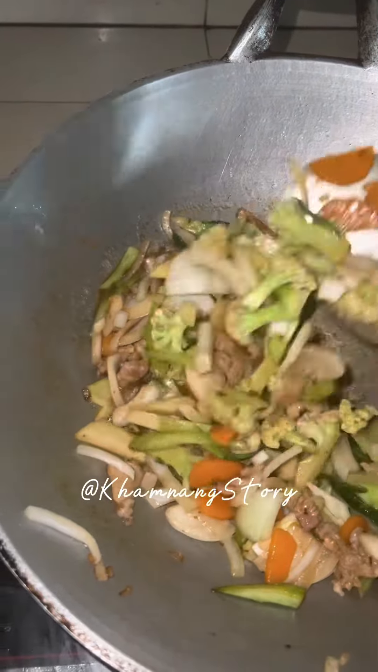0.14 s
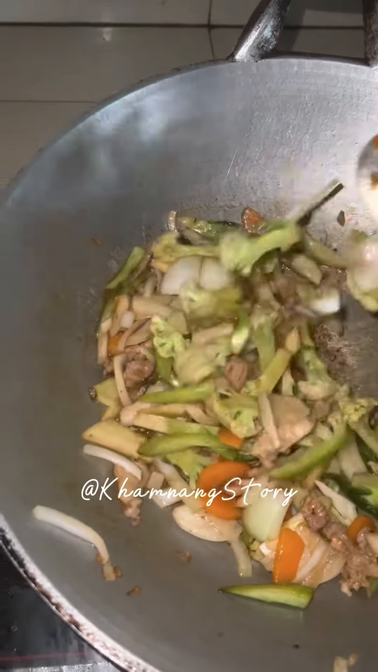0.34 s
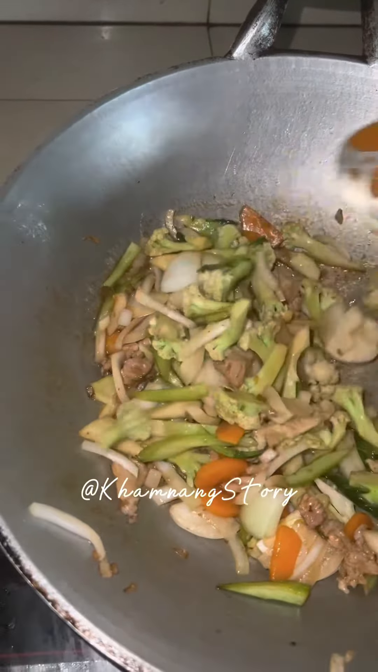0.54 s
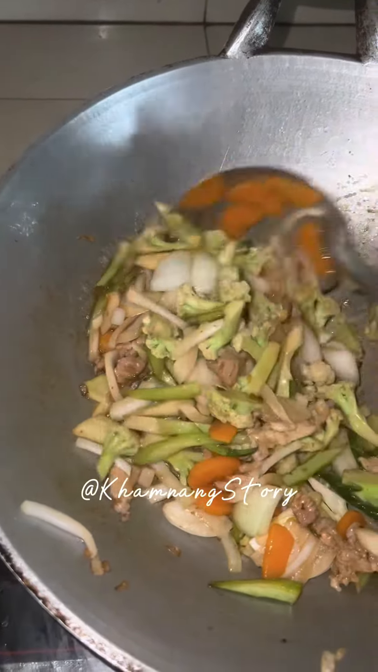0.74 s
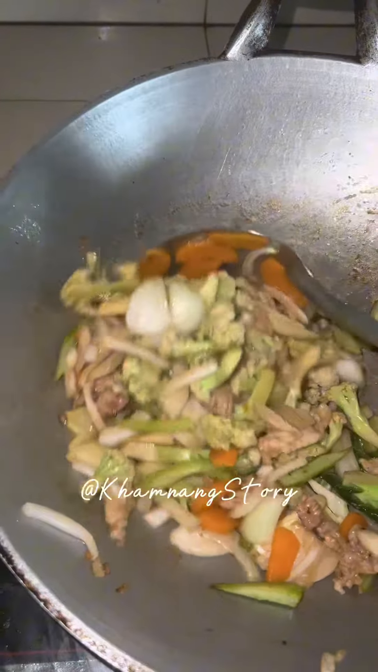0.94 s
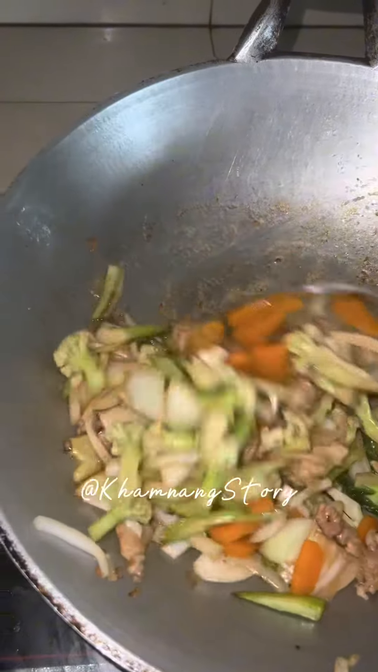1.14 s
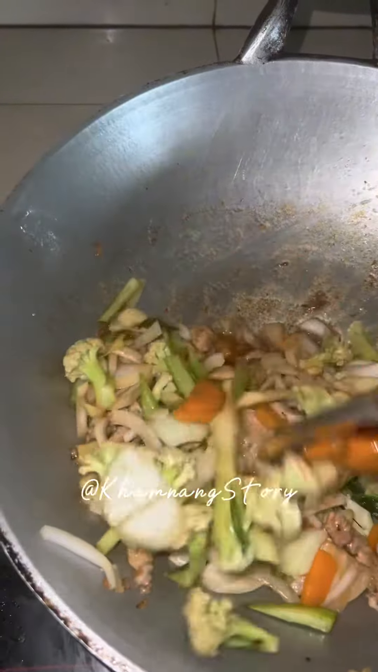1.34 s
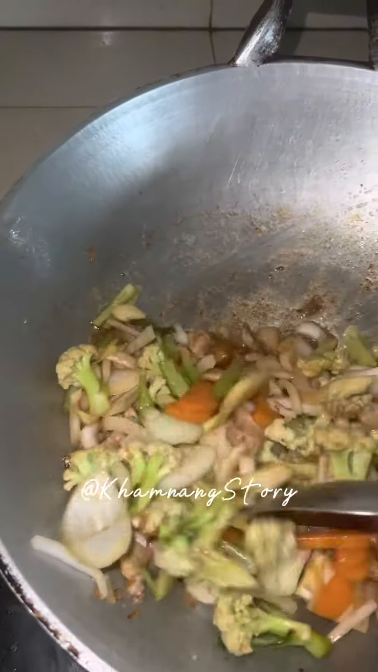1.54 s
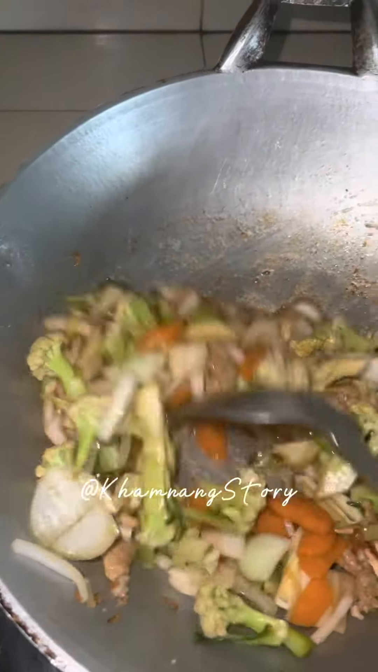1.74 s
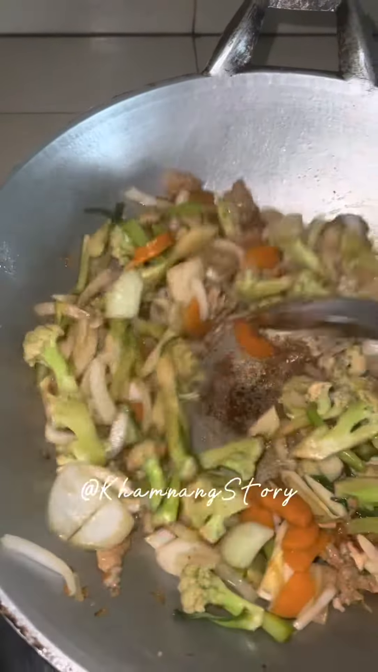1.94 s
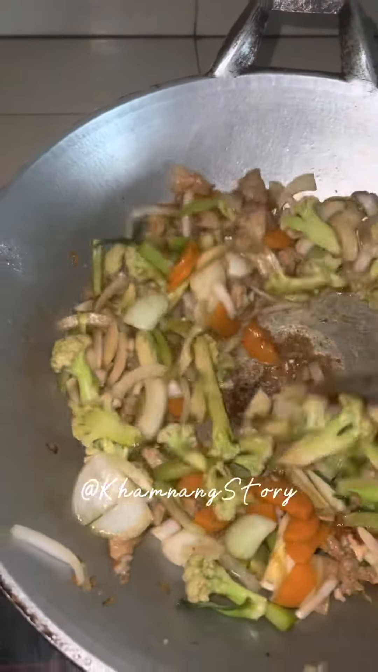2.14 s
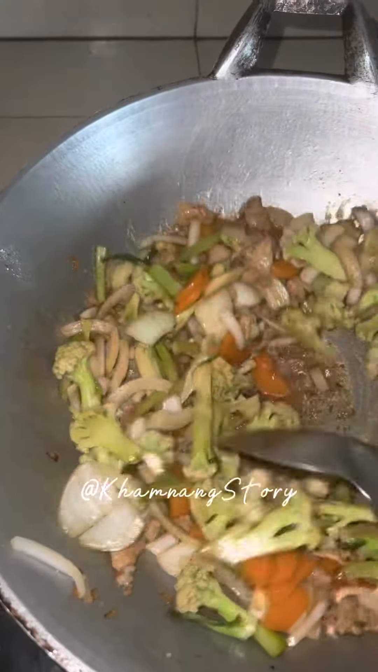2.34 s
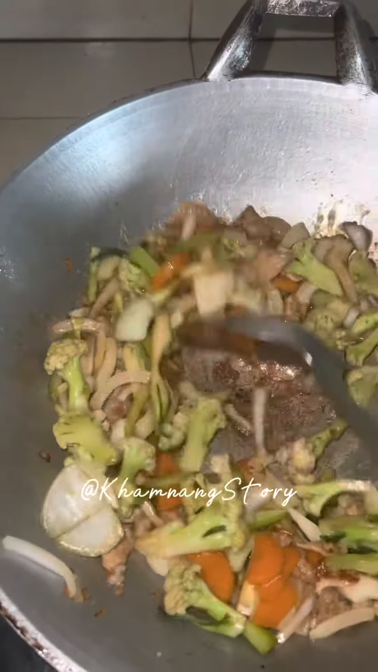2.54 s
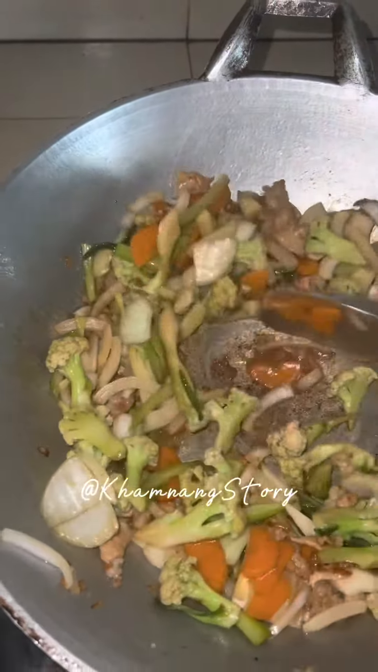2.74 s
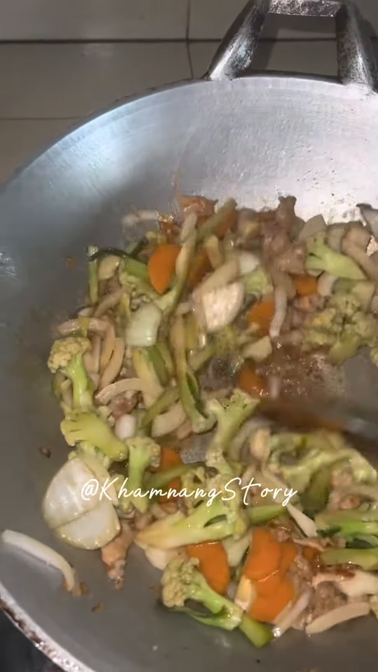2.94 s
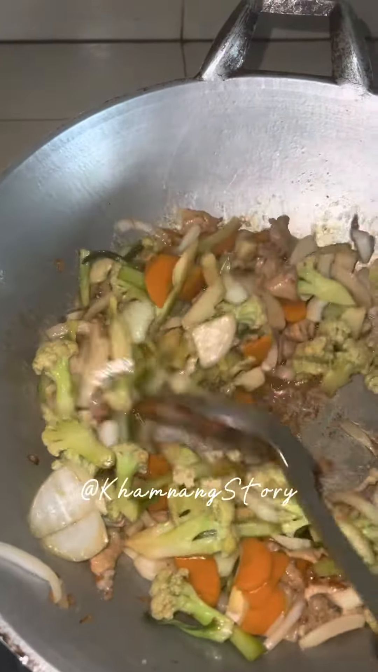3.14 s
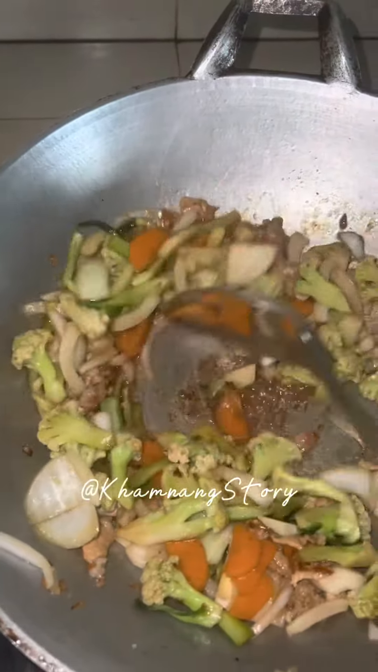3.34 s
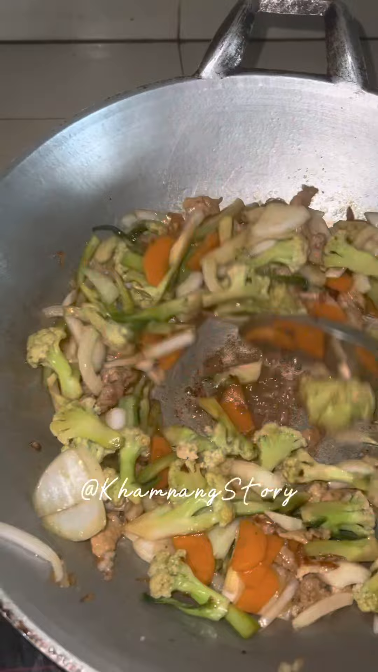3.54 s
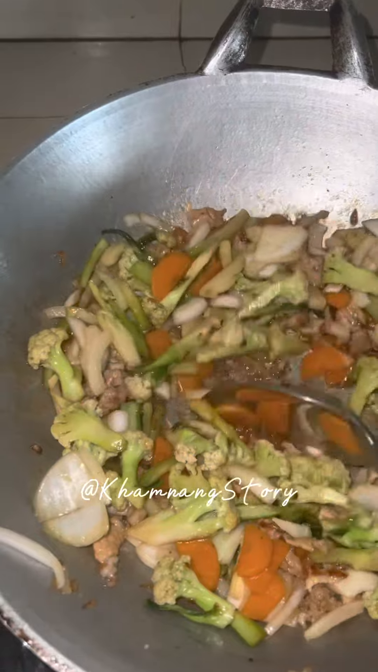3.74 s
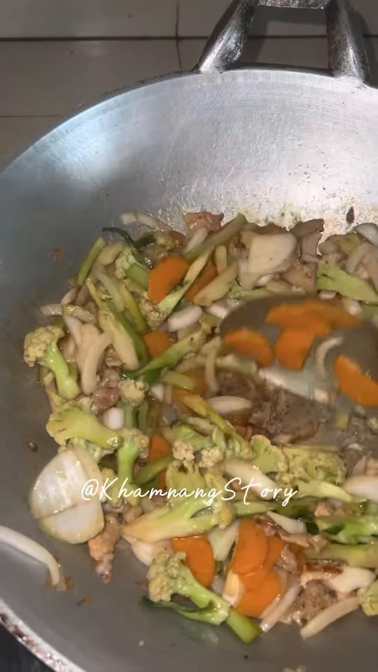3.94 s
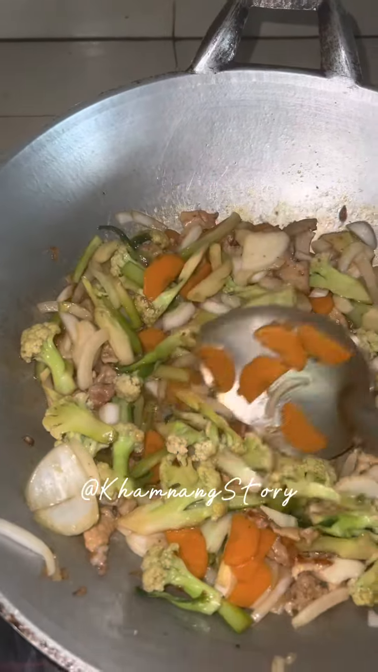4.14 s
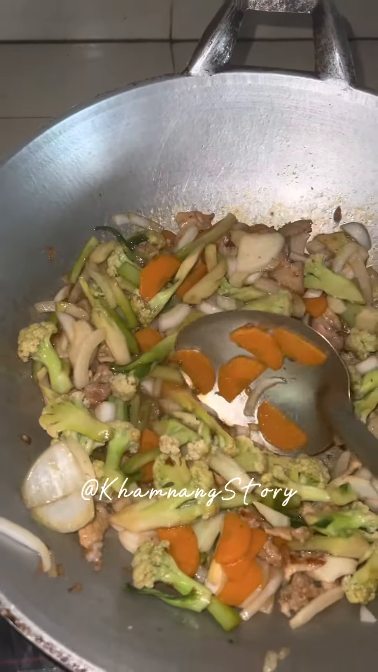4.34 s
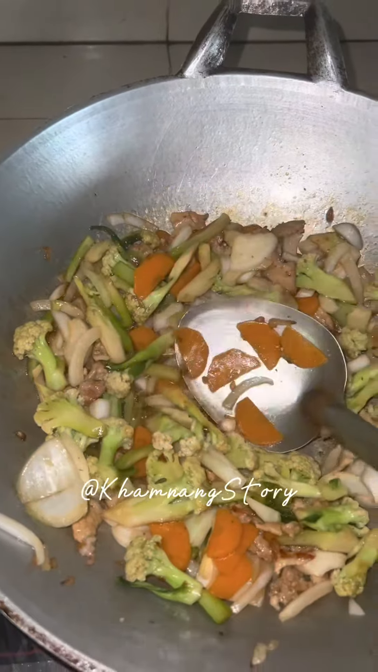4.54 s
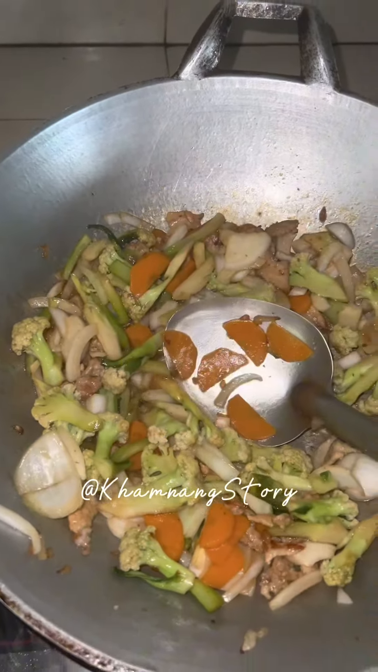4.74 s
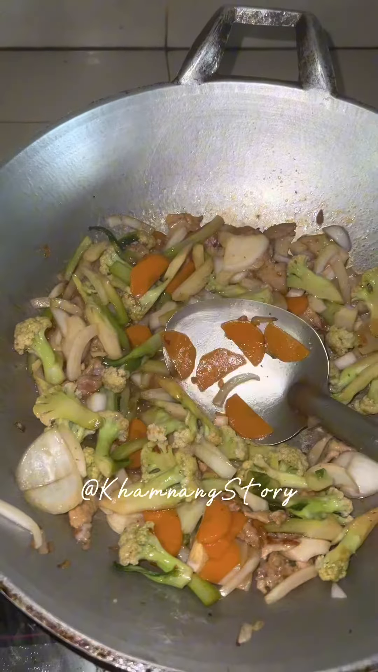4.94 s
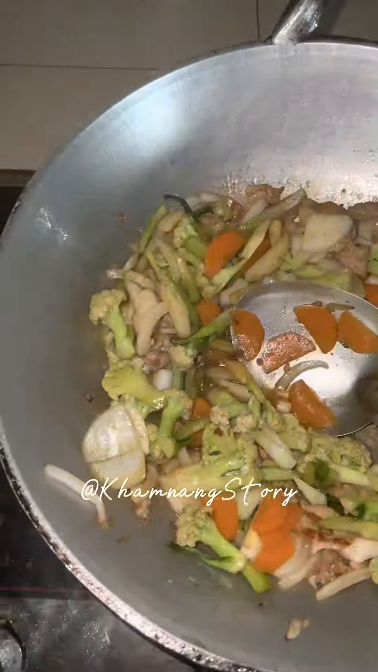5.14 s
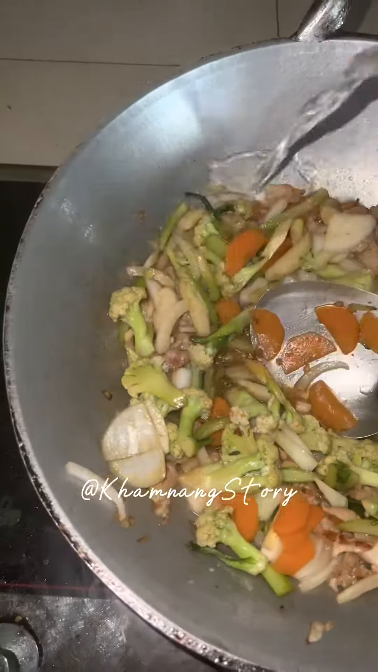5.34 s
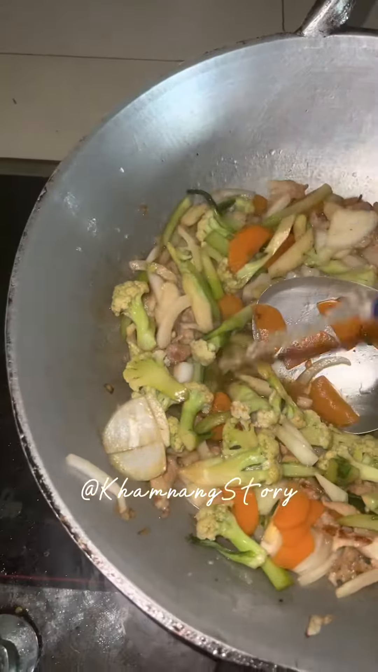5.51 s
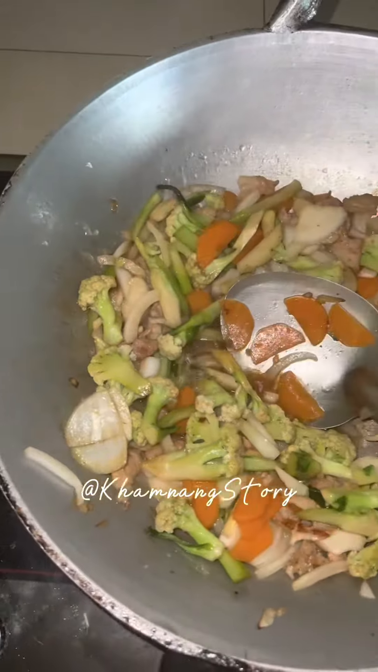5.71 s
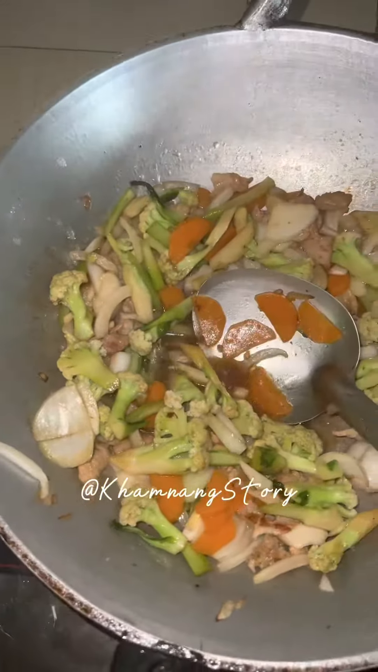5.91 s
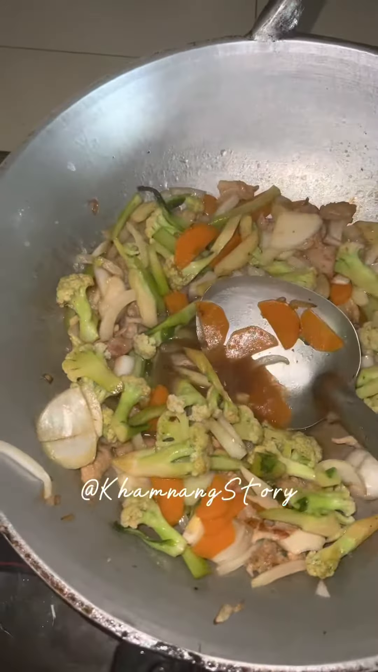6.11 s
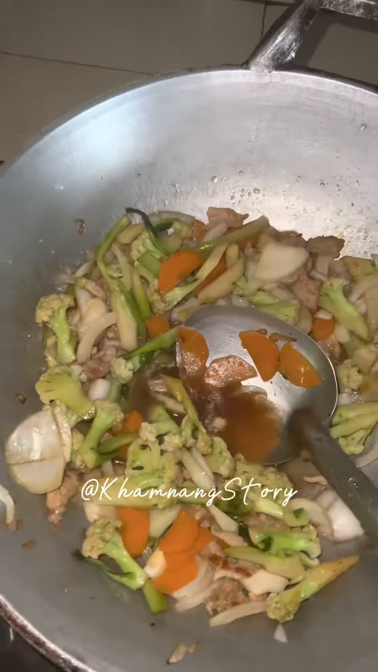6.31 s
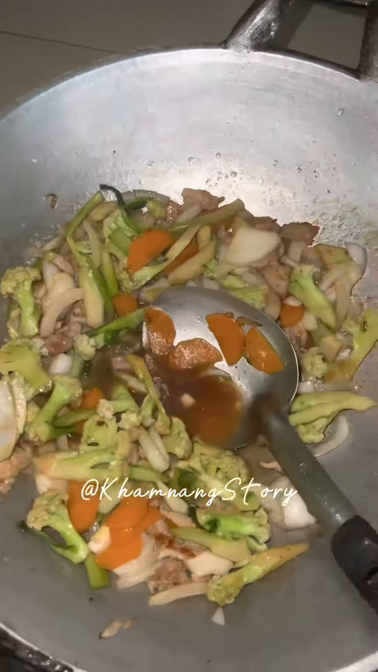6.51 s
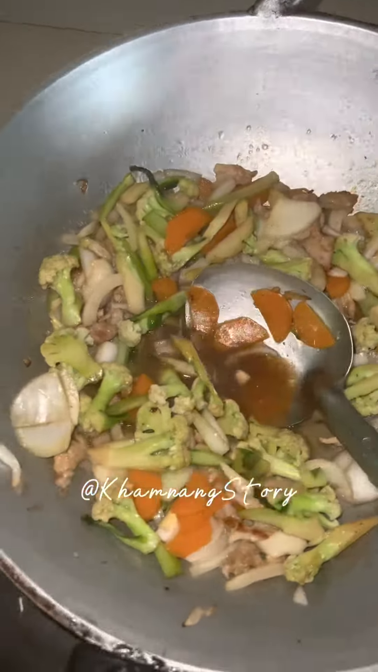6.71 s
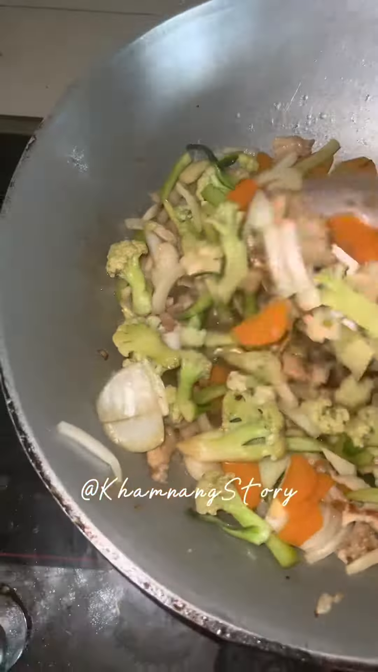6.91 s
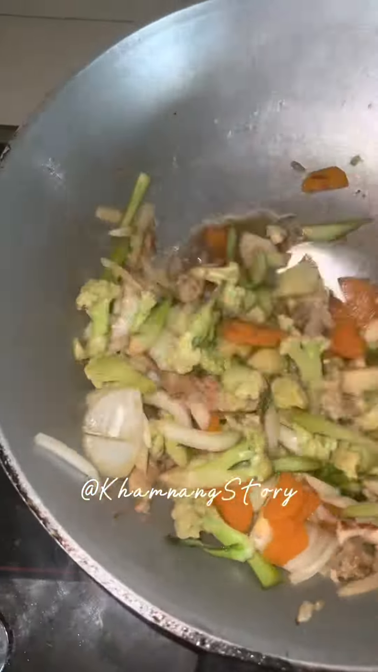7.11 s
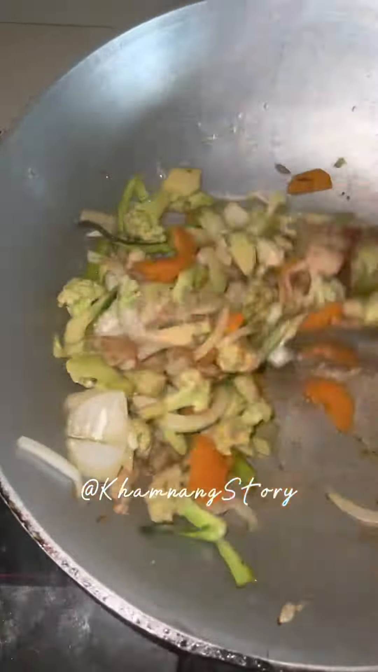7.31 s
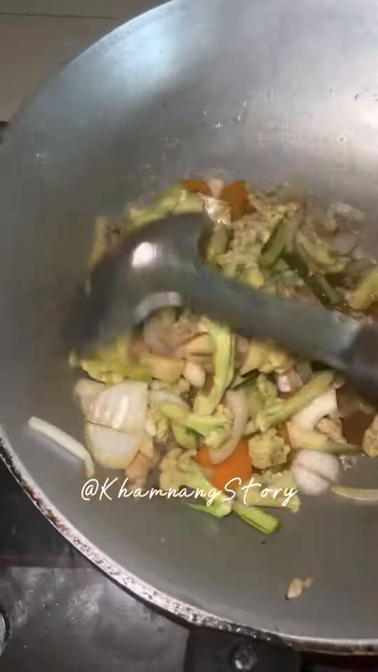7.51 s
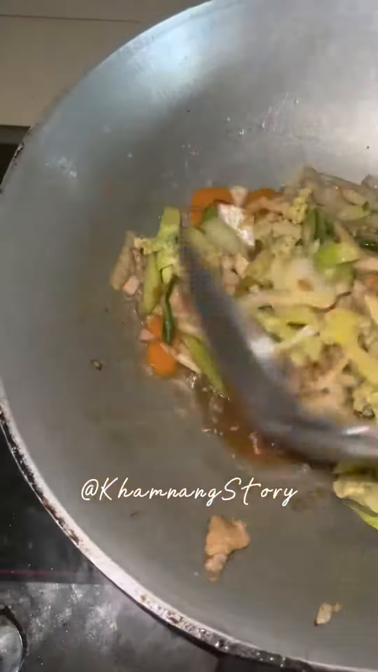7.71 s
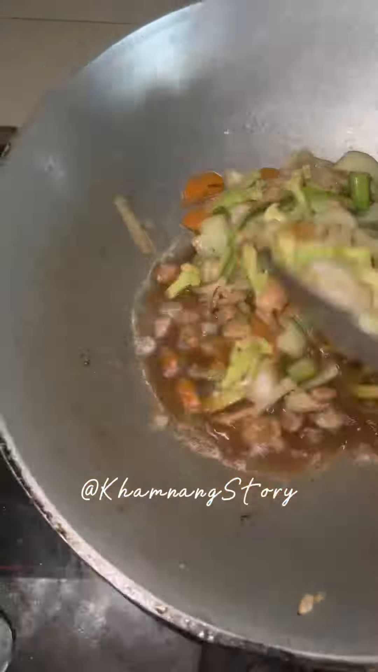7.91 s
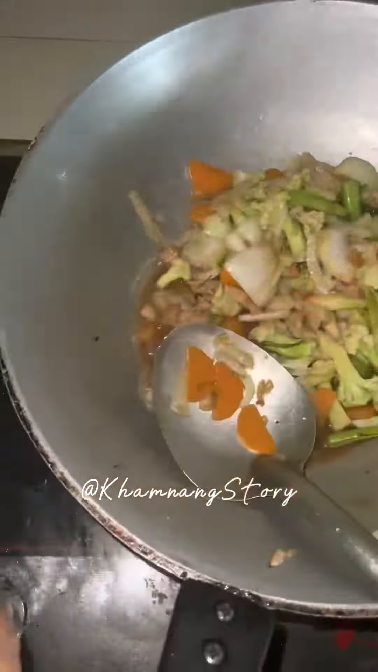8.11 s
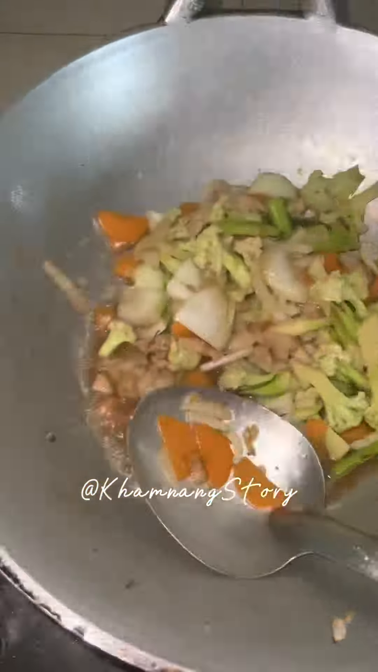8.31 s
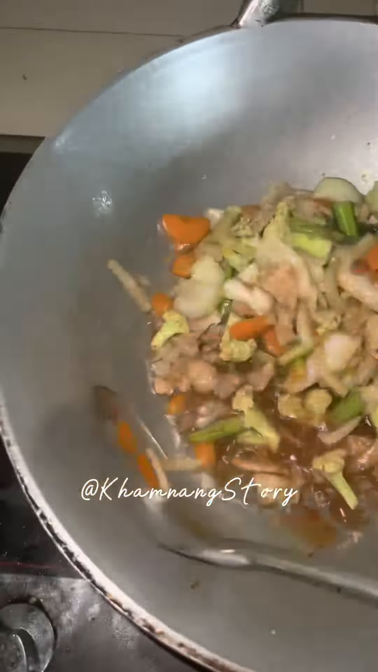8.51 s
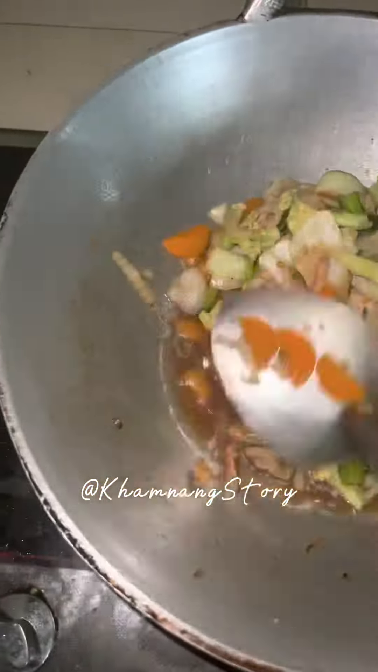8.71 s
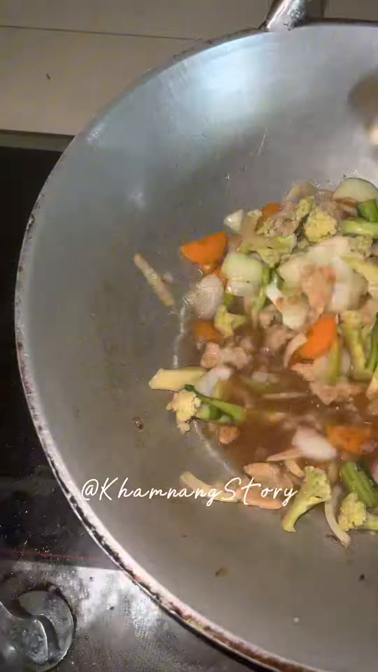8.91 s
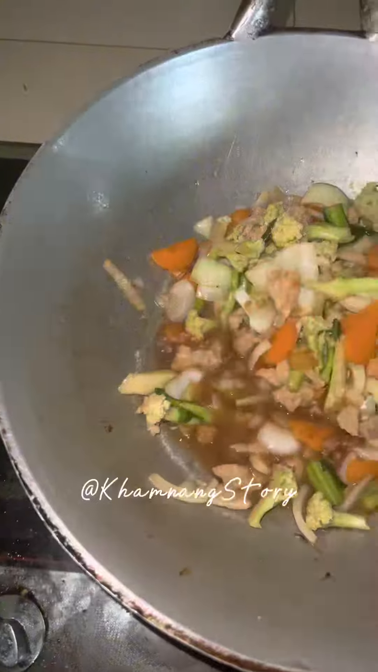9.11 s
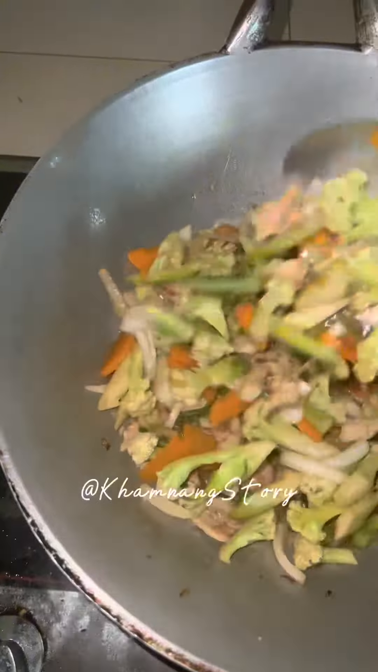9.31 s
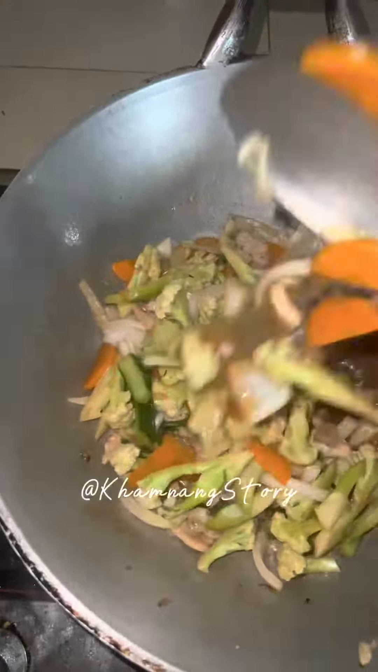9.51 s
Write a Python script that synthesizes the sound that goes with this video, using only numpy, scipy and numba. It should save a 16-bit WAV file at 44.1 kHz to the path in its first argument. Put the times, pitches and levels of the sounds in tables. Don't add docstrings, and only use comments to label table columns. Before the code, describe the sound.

Slow-motion stir-frying with drawn-out metallic knocks and groaning scrapes over low rumble and fizz, then the speed jumps to crisp, sharp ladle clatter.

```python
import sys
import numpy as np
from scipy import signal
from scipy.io import wavfile
from scipy.ndimage import uniform_filter1d
from numba import njit

SR = 44100
rng = np.random.default_rng(int(sys.argv[2]) if len(sys.argv) > 2 else 0)


def log_audio(samples):
    frames = np.atleast_2d(samples).T
    limited = np.clip(frames, -1, 1)
    pcm = np.round(limited * 32767).astype(np.int16)
    wavfile.write(sys.argv[1], SR, pcm)


def field_ratio(decibels):
    return 10 ** (np.asarray(decibels, dtype=float) / 20)


N = 426006

# time in seconds, factor on every pitch (1 = slow motion).
SPEED = [(0, 1), (5.07, 1), (5.09, 2.8), (5.3, 3.2), (5.6, 4.2), (5.9, 6), (6.25, 7.6), (6.55, 8.3),
         (6.79, 8.75), (6.94, 9.37), (7.48, 10.74), (7.7, 10.88), (9.7, 10.88)]
# time in seconds, sizzle level in dB, how open the hot steel lies (about -1 to 1).
FRYING = [(0, -41.5, 0.25), (.62, -38, 0.054), (1.32, -40.5, -0.18), (1.9, -36.5, -0.15), (2.5, -41, 0.23),
          (3.35, -39, 0.13), (3.9, -40, 0.17), (5.05, -40, -0.094), (5.1, -41, 0.27), (5.3, -41, 0.36),
          (5.51, -42, 0.32), (6.5, -47, -0.14), (7.05, -41.5, -0.4), (7.56, -48.5, -0.88), (8.2, -49, -1.5),
          (8.6, -50, -0.61), (9.0, -49.5, -0.29), (9.66, -45.5, -0.48)]


def evened(x):
    return x / np.sqrt(np.mean(x ** 2) + 1e-20)


def read(points, hz):
    f, value = np.transpose(points)
    return np.interp(np.log(hz + 1), np.log(f + 1), value)


def curve(rows, t):
    s, *columns = np.transpose(rows)
    return np.array([np.interp(t, s, c) for c in columns])


def add(mix, s, sound):
    part = mix[..., round(s * SR):][..., :sound.shape[-1]]
    part += sound[..., :part.shape[-1]]


@njit
def ring(drive, speed, turn, fade):
    out, state, step = np.zeros(len(drive)), 0j, 0j
    for n in range(len(drive)):
        if n % 32 == 0:
            step = np.exp((1j * turn - fade) * speed[n]) * (turn * speed[n] < 2.7)
        state = state * step + drive[n]
        out[n] = state.imag
    return out


@njit
def radiate(x, speed, turn):
    out, last, a, b = np.zeros(len(x)), 0., 0., 0.
    for n in range(len(x)):
        keep = 1 / (1 + turn * speed[n])
        before = a
        a = keep * (a + x[n] - last)
        b = keep * (b + a - before)
        last, out[n] = x[n], b
    return out


def sizzle():
    # pitch in slow motion in Hz, strength in dB per Hz.
    fizz_colour = [(13, -16), (36, -2), (550, -6.5), (850, -2.5), (1780, -2), (2200, -8.5), (4300, -11.5),
                   (12400, -26)]
    # time in seconds, lift in dB per octave.
    top_lift = [(5.08, -1), (5.6, 5), (6.1, 5), (6.4, 3.5), (6.75, 8), (7.2, 5), (7.6, 4.5), (8.0, 3),
                (8.6, 0.5), (9.66, -1.5)]
    spit_size = field_ratio(3.0 * np.minimum(rng.exponential(1, (2, N)), 5))
    spits = spit_size * (rng.random((2, N)) < 2500 / SR)
    noise = rng.standard_normal((2, N)) * (1 + .8 * spits)
    hz, t, z = signal.stft(noise, SR, nperseg=1024, noverlap=768)
    speed = curve(SPEED, t)
    level_db, bare = curve(FRYING, t)
    tilt_db = 4.5 * bare * np.log2(hz[:, None] / 2000 + 0.55)
    colour = field_ratio(read(fizz_colour, hz[:, None] / speed) + tilt_db)
    colour *= field_ratio(curve(top_lift, t) * np.log2(np.maximum(hz[:, None] / 8200, 1)))
    patches = uniform_filter1d(rng.standard_normal(colour.shape), 10, 0)
    patches = evened(uniform_filter1d(patches, 12, 1))
    patch_db = 1.5 * patches / speed ** 0.28
    z *= colour / np.sqrt((colour ** 2).mean(0)) * field_ratio(level_db - 1.0 + patch_db)
    return signal.istft(z, SR, nperseg=1024, noverlap=768)[1][:, :N]


def burner(speed):
    bare = curve(FRYING, np.arange(N) / SR)[1]
    level_db = -43 + (speed > 1.5) * (-11 - 12 * bare)
    return field_ratio(level_db - 42.0) * np.sqrt(speed) * rng.standard_normal((2, N))


def blows():
    # time in seconds, then click, thud, bowl and rim in dB.
    slow_knocks = [(0.396, -16, -38.5, -12, -16), (0.431, -47, -33.5, -41, -51),
                   (0.4571, -21, -23, -24.5, -52), (1.662, -37, -46, -22.5, -34),
                   (1.8758, -6.5, -41, -6.5, -16), (2.037, -44, -58, -31, -36), (2.056, -41, -58, -22, -30),
                   (2.073, -36, -65, -37, -36), (2.0878, -32, -59, -16.5, -20.5),
                   (2.215, -50, -62, -26, -51), (2.2601, -43, -54, -24, -31),
                   (2.4087, -32, -53, -21.5, -29), (2.6363, -49, -60, -31.5, -35),
                   (2.7536, -17, -62, -10.5, -36), (2.806, -36, -58, -24, -15), (2.828, -21, -65, -25, -25),
                   (2.846, -29, -54, -25, -19.5), (2.869, -28, -60, -24, -15.5),
                   (2.8872, -20, -56, -34, -19.5), (2.948, -36, -60, -31, -27),
                   (3.1704, -43, -53, -27.5, -52), (3.2077, -31, -60, -40, -38),
                   (3.4581, -50, -62, -12.5, -26), (3.5657, -50, -66, -24.5, -30.5),
                   (3.6076, -49, -45, -29, -40), (4.0498, -19.5, -41, -32, -49),
                   (4.431, -24, -40, -11.5, -51)]
    fast_knocks = [(6.7904, 10, -27.5, -13, -28), (6.9435, 17, -31.5, -31, -16),
                   (7.0482, -9, -17.5, -15.5, -44), (7.3501, 11, -24.5, -22.5, -25),
                   (7.4396, 4, -39, -22, -25), (7.4802, -30, -39, -23.5, -42),
                   (7.597, -1.5, -33.5, -20, -44), (7.718, 11, -34, -28, -42), (7.8202, 9, -38, -14, -40),
                   (7.9708, 11, -43, -21.5, -36), (8.045, -4, -44, -31, -52), (8.056, -28, -58, -37, -52),
                   (8.203, -40.5, -45, -25, -55), (8.2334, -40, -33.5, -30, -55),
                   (8.275, -44, -60, -36, -55), (8.3487, -45, -36, -40, -44), (8.3795, 7, -68, -28, -23),
                   (8.4922, 12, -21, -28, -42), (8.763, -11, -36, -50, -19), (9.1269, 5, -25.5, -17.5, -28),
                   (9.2178, 14, -27.5, -22, -23), (9.241, -27, -36, -50, -36),
                   (9.3685, 12, -21.5, -16, -25), (9.4043, -20, -37, -48, -28)]
    # time in seconds, click in dB.
    ticks = [(6.8108, -5), (7.4814, -6), (7.636, -15), (7.732, 0), (7.9795, 5), (8.3525, -11), (8.796, -30),
             (9.0425, -9), (9.373, 1), (9.593, 1)]
    # time in seconds, ring in dB.
    lips = [(.396, -18.5), (1.8765, -17.5), (4.433, -18), (6.795, -28), (6.9467, -27), (7.597, -15),
            (7.8196, -17), (7.9709, -12.5), (8.3795, -22.5)]
    touches = [(s, db, db - 48.5, db - 32, db - 37) for s, db in ticks]
    rows = []
    for s, click, thud, bowl, rim in slow_knocks + fast_knocks + touches:
        ladle = max(bowl - 13.5, click - 36)
        rows.append((s, thud, bowl, ladle, rim, click))
    return rows + [(s, -99, -99, db, -99, -99) for s, db in lips]


def knocks(speed):
    drive = np.zeros((5, 2, N))
    for s, *parts_db in blows():
        pace = speed[round(s * SR)]
        fast = pace > 2
        t = np.arange(2000) / SR * pace ** 0.95
        contact = (1 - np.exp(-t / .0012)) * np.exp(-t / .003)
        rattle = field_ratio(-21.5 + 10 * fast) * np.exp(-t / 0.034)
        contact = (contact + rattle) * rng.standard_normal((2, 2000))
        contact /= np.linalg.norm(contact, axis=1)[:, None]
        part_gain_db = np.array([2.5, -4.0, -7.5, -2.5 - 15 * fast, 0.5 - 11 * fast])
        push = field_ratio(np.array(parts_db) + part_gain_db)[:, None, None] * contact
        add(drive[1:], s, push[1:])
        thud_lag_s = 0.00504 * fast
        add(drive[0], s + thud_lag_s, push[0])
    return drive


def pressure(speed):
    # start in seconds, length in seconds, then grit, bowl and rim in dB.
    strokes = [(0.404, 0.076, -38, -44, -45), (.47, 0.13, -40, -43, -55), (0.543, 0.19, -38, -29.5, -56),
               (0.702, 0.092, -31.5, -30.5, -57), (1.258, 0.097, -57, -31.5, -57),
               (1.653, 0.13, -37, -40, -34.5), (1.863, 0.037, -45, -44, -25), (1.882, 0.024, -56, -43, -45),
               (1.926, 0.31, -32.5, -25.5, -31.5), (2.19, 0.37, -33.5, -26.5, -40.5),
               (2.373, 0.24, -34, -34.5, -41), (2.39, .17, -33, -45, -43), (2.535, 0.19, -33, -28, -39),
               (2.68, 0.11, -31, -26.5, -37), (2.748, 0.13, -39, -14, -21), (2.768, 0.068, -42, -14.5, -25),
               (2.812, 0.075, -39, -12.5, -19), (2.838, 0.08, -39, -15, -31),
               (2.885, 0.046, -38, -20.5, -29), (2.904, 0.2, -33, -26, -48), (3.147, 0.12, -31.5, -25, -38),
               (3.217, 0.17, -29, -28, -43), (3.432, 0.11, -33, -42, -31), (7.453, 0.028, -32, -59, -65),
               (7.476, 0.03, -30.5, -62, -65), (7.586, 0.025, -49, -41, -54),
               (7.598, 0.027, -32.5, -56, -48), (7.813, 0.041, -36, -59, -39), (8.143, 0.15, -54, -54, -61),
               (8.75, 0.13, -42.5, -63, -64), (9.229, 0.022, -32, -51, -58), (8.386, .024, -40, -60, -60),
               (8.505, 0.033, -46, -69, -60)]
    gain = np.zeros((3, N))
    peak = 0.46
    for s, length, *parts_db in strokes:
        u = np.arange(0, 1, 1 / (length * SR))
        away = np.where(u < peak, 1 - u / peak, (u - peak) / (1 - peak))
        add(gain, s, field_ratio(np.array(parts_db)[:, None] - 19 * away ** 3))
    for s, _, bowl, _, rim, click in blows():
        pace = speed[round(s * SR)]
        start_db = np.array([click, bowl, rim]) + [-27, -7, -19]
        start_db = start_db - 13.5 * np.log10(pace) - 9 * (pace > 2)
        fade_db_per_s = 179.5 * pace ** 0.29
        add(gain, s + 0.0027, field_ratio(start_db[:, None] - fade_db_per_s * np.arange(12000) / SR))
        graze_s = 0.017 / pace ** 0.29
        graze = np.arange(0, 1, 1 / (graze_s * SR)) ** 2
        add(gain, s - graze_s, field_ratio(start_db[:, None] - 25.5) * graze)
    return uniform_filter1d(gain, 300) * np.sqrt(speed)


def drags(speed):
    grit, bowl, rim = pressure(speed)
    clumps = field_ratio(1.6 * evened(uniform_filter1d(rng.standard_normal(N), 400)))
    size = field_ratio(1.8 * np.minimum(rng.exponential(1, (2, N)), 5)) * rng.choice([-1, 1], (2, N))
    chance = np.minimum(3000 * speed / SR, .5)
    slips = evened(clumps * size * (rng.random((2, N)) < chance))
    pushes = [field_ratio(-76.0) * bowl, field_ratio(-27.0) * bowl, field_ratio(-43.0) * bowl, field_ratio(-26.5) * rim, field_ratio(-11.5) * grit]
    return slips * np.array(pushes)[:, None]


def wok(speed):
    # pitch in Hz, level in dB, 60 dB fade in seconds.
    part_notes = [
        [(35.6, -3, 0.6), (40.4, 4.5, 0.57), (64, -10, 0.37), (92, -16, 0.16)],
        [(159, 3.5, 0.018), (189, -20.5, 0.63), (235, -9, 0.13), (292, -2, 0.068), (337.7, -3.5, 0.056),
         (378, 0.5, 0.031), (475, -2.5, 0.023), (705, -15, 0.035), (850, -12.5, 0.039), (1050, -19.5, 0.013)],
        [(517, 16.5, 0.03), (581, 3.5, 0.42), (650, -20, 0.066), (1100, -17.5, 0.015)],
        [(703, -6.5, 0.14), (944, -5.5, 0.071), (1110, 5.5, 0.019), (1336.6, 4.5, 0.086), (1385, 8, 0.062),
         (1461, -4.5, 0.076)],
        [(390, -8.5, 0.0029), (1400, 2, 0.002), (1825, -21, 0.071), (2213, -18, 0.057), (2386, -20, 0.024),
         (2870, -11.5, 0.0097), (3210, -21, 0.044), (3875, -17.5, 0.016), (4520, -32, 0.062),
         (5560, -16, 0.0069)],
    ]
    cut_follow = [1, .5, .5, .5, .3]
    cut_share = [0.81, 1, 0.72, 0.82, 0.81]
    drive, out = knocks(speed) + drags(speed), np.zeros((2, N))
    drive[0] += burner(speed)
    for part, modes, follow, share in zip(drive, part_notes, cut_follow, cut_share):
        cut = share * 2 * np.pi * modes[0][0] / SR
        cut_speed = speed ** follow
        for k in range(2):
            rings = sum(field_ratio(db) * ring(part[k], speed, 2 * np.pi * hz / SR, np.log(1000) / t60 / SR)
                        for hz, db, t60 in modes)
            out[k] += radiate(radiate(rings, cut_speed, cut), cut_speed, cut)
    return out


def tap(s, level_db, modes, tick_db):
    t, out = np.arange(8000) / SR, np.zeros((2, N))
    played = np.cumsum((curve(SPEED, s + t)[0] / curve(SPEED, s)[0]) ** 0.46) / SR
    rings = sum(field_ratio(db - 60 * t / t60) * np.sin(2 * np.pi * hz * played) for hz, db, t60 in modes)
    rings = rings * (1 - np.exp(-t / 0.0012))
    tick = rng.standard_normal((2, 8001))[:, 1:] * np.exp(-t / .004)
    add(out, s, field_ratio(level_db) * (rings + field_ratio(tick_db) * tick))
    return out


def clank():
    # pitch in Hz, level in dB, 60 dB fade in seconds.
    clank_notes = [(1526, 10.5, 0.022), (2290, -14.5, 0.096), (2685, 8, 0.011), (2850, 0.5, 0.025),
                   (3500, -14.5, 0.055)]
    return tap(.3965, -9, clank_notes, tick_db=-56)


def spots():
    # time in seconds, dB, lower Hz, upper Hz.
    chinks = [(6.7904, -12, 3660, 14600), (6.7948, -14, 2500, 5150), (6.9435, -8, 6030, 9900),
              (6.9462, -13, 5560, 10500), (7.0482, -19, 1335, 4690), (7.0508, -39, 2325, 7400),
              (7.0563, -24, 2180, 5600), (7.3501, -12, 5600, 12100), (7.3531, -11, 2280, 12000),
              (7.4397, -13.5, 3040, 12500), (7.4638, -30, 3790, 13350), (7.4799, -20, 4300, 6000),
              (7.4857, -27, 4565, 7100), (7.4902, -27, 6300, 7800), (7.6114, -32, 1120, 6420),
              (7.7176, -22, 3900, 12360), (7.7317, -25, 9345, 12100), (7.8207, -22, 1850, 6300),
              (7.8252, -29, 2240, 5470), (7.8288, -22, 1830, 6340), (7.8322, -23, 1870, 15200),
              (7.9711, -9, 5970, 8400), (7.9803, -18, 2530, 6500), (8.0456, -31, 4300, 5940),
              (8.1935, -44, 5900, 9500), (8.2027, -34, 3130, 5940), (8.2331, -31, 1970, 3830),
              (8.2358, -38, 1640, 3660), (8.2508, -34, 1900, 3875), (8.2759, -35, 1900, 4390),
              (8.352, -37, 1420, 3000), (8.3795, -15, 1230, 12700), (8.3798, -18, 2130, 7560),
              (8.3834, -28, 4000, 6270), (8.492, -11, 11370, 14100), (8.4944, -22, 3820, 10100),
              (8.7635, -35, 11450, 13260), (9.0417, -36, 3600, 13200), (9.1268, -22, 2330, 11400),
              (9.1296, -17.5, 2300, 3800), (9.2176, -11, 4520, 13220), (9.2389, -27, 8350, 12000),
              (9.3684, -9, 5100, 13400), (9.3727, -8.5, 5700, 12000), (9.4034, -27, 6030, 13300),
              (9.4054, -17, 13000, 14800), (9.5928, -30, 3000, 5630), (9.5972, -38, 2885, 5210)]
    # time in seconds, dB, lower Hz, upper Hz.
    more_chinks = [(6.7903, -13, 3150, 8800), (6.7956, -26, 5000, 9600), (6.808, -33, 4000, 4700),
                   (6.9433, -11.5, 3500, 12800), (6.948, -19, 3000, 10800), (7.361, -31, 6000, 6400),
                   (7.4374, -30, 11000, 15600), (7.4395, -10.5, 6900, 15100), (7.44, -14.5, 4780, 12300),
                   (7.4413, -21, 4050, 13000), (7.8213, -20, 5400, 6200), (8.4965, -26, 2040, 3950),
                   (9.2225, -28, 2200, 3300), (9.3704, -15, 3700, 3970)]
    # time in seconds, dB, Hz, 60 dB fade in seconds.
    booms = [(0.398, -10.5, 413, 0.082), (.458, -21.5, 406, 0.083), (1.664, -30, 320, 0.043),
             (2.06, -20, 298, 0.074), (2.262, -17.5, 320, 0.046), (2.7545, -11, 246, 0.075),
             (2.7545, -25, 594, 0.028), (3.169, -27, 277, .06), (3.21, -18.5, 318, 0.05),
             (3.46, -14.5, 187, 0.11), (4.433, -16, 257, 0.1), (.398, -6.5, 1050, 0.029),
             (1.879, -34, 593, 0.18), (2.089, -18, 1400, 0.072), (3.46, -17.5, 390, 0.08),
             (4.432, -16, 398, 0.062), (4.433, -19.5, 678, 0.093), (6.793, -28, 800, .03),
             (7.05, -30, 884, 0.029), (7.353, -28, 960, .03), (7.824, -29, 830, 0.044),
             (7.973, -35, 890, .03), (8.38, -35, 700, 0.02), (8.495, -33, 730, .025),
             (9.13, -31, 1250, .03), (9.22, -31, 940, 0.025), (9.374, -32, 674, 0.043),
             (.4, -28, 160.4, 0.19), (1.86, -22, 1455, 0.066), (4.432, -22, 197, 0.14),
             (4.433, -23, 550, 0.054), (7.054, -23, 405, 0.091), (8.79, -36, 264, 0.057),
             (9.134, -26.5, 397, 0.081), (9.227, -27, 390, 0.089)]
    # time in seconds, dB, Hz.
    catches = [(1.973, -26, 282), (1.997, -22.5, 330), (2.031, -18.5, 380), (2.106, -16.5, 336),
               (2.124, -23, 375), (2.154, -21, 342), (2.184, -27, 400), (2.221, -27, 401),
               (2.412, -22, 348), (2.641, -19, 317), (2.779, -11, 385), (2.795, -13, 340), (2.815, -9, 404),
               (2.806, -17, 1380), (2.828, -13, 1400), (2.846, -6.5, 1323), (2.858, -14, 1300),
               (2.868, -10, 1314), (2.888, -8.5, 1415), (2.905, -18.5, 248), (3.461, -18, 150),
               (4.4335, -12.5, 536), (2.832, -17, 340), (2.865, -13, 402), (2.887, -15.5, 238),
               (1.88, -22, 581), (3.46, -16, 258), (6.981, -36, 750)]
    out, t = np.zeros((2, N)), np.arange(6000) / SR
    notes = []
    for s, db, *pair in chinks + more_chinks:
        soft_s = .0003 * max(-14 - db, 0)
        for hz, lift_db in zip(pair, (-2.5, 1.25)):
            notes.append((s, db + lift_db, hz, 0.004 + 5 / hz + soft_s, 0.0002))
    notes += [(*row, .003) for row in booms]
    notes += [(s, db, hz, 0.028 + 14 / hz, .002) for s, db, hz in catches]
    phases = np.array([[0], [np.pi / 2]])
    for s, db, hz, t60, rise in notes:
        swell = field_ratio(db - 60 * t / t60) * (1 - np.exp(-t / rise))
        add(out, s, swell * np.sin(2 * np.pi * hz * t + phases))
    for s, db, *_ in chinks + more_chinks:
        crack = np.diff(rng.standard_normal((2, 201))) / 2
        add(out, s, field_ratio(db - 1) * np.exp(-t[:200] / .0004) * crack)
    return signal.lfilter(*signal.butter(2, 140, "high", fs=SR), out)


def smack():
    # pitch in Hz, level in dB, 60 dB fade in seconds.
    smack_notes = [(964, 1, 0.015), (1362, -14, 0.084), (1690, 4, 0.013), (2120, -18, 0.055),
                   (1150, -3, 0.012), (2630, -7, 0.0079), (3320, -11, 0.0094), (4300, -5, 0.008),
                   (5240, -17, 0.009)]
    return tap(1.878, -3.5, smack_notes, tick_db=-26)


def bottle():
    # pitch in Hz, level in dB, 60 dB fade in seconds.
    bottle_notes = [(675, 4, 0.18), (700, -12, 0.12), (1800, 0.5, 0.015), (2500, 6, 0.014),
                    (2620, -12, 0.096), (2690, -11, 0.092), (5640, 1.5, 0.028)]
    s, rock_s = 6.4303, .0075
    return tap(s, -33.5, bottle_notes, tick_db=6.5) + tap(s + rock_s, -32.5, bottle_notes, tick_db=3)


def puffs():
    # time in seconds, level in dB, length in seconds.
    pushes = [(6.789, -30.5, 0.00074), (6.944, -35, 0.00086), (7.0484, -42, 0.00075), (7.353, -27, 0.0007),
              (7.4405, -28.5, 0.0011), (7.593, -25, 0.00064), (7.718, -34, 0.00065),
              (7.824, -24.5, 0.00096), (7.971, -30, 0.00086), (8.38, -24, 0.00074), (8.492, -25, 0.00095),
              (8.767, -37, 0.00095), (9.125, -41, 0.0021), (9.217, -33, 0.00077), (9.37, -30, 0.00067)]
    out = np.zeros((2, N))
    for s, db, length in pushes:
        add(out, s, field_ratio(db) * np.sin(np.pi * np.arange(0, 1, 1 / (length * SR)))[None] ** 2)
    return out


def ports(pair, diffuse):
    # pitch in Hz, how alike the two sides are (0 to 1).
    likeness = [(40, 0.97), (150, 0.94), (400, 0.45), (950, 1), (2000, 0.27), (3500, 0.66), (9000, 0.16)]
    # pitch in Hz, left over right in dB.
    balance = [(60, 0.5), (110, -.5), (200, 0.5), (380, -8.5), (700, -3.5), (1290, 1.5), (2380, -1),
               (4400, 0), (8120, 0), (15000, -0.5)]
    # pitch in Hz, how far left leads in radians.
    left_lead = [(90, 0), (260, -.7), (600, .5), (1120, -.3), (1640, -2.2), (2670, -.8), (4400, -1),
                 (9500, -2), (13000, -4.4), (16000, -4.7)]
    hz, t, (a, b) = signal.stft(pair, SR, nperseg=256, noverlap=192)
    speed = curve(SPEED, t)
    slow_hz = hz[:, None] / speed
    apart = 0.096 * (speed > 2) * np.minimum(hz[:, None] / 8000, 1)
    same = np.clip(1 - diffuse * (1 - read(likeness, slow_hz)) - apart, 0, 1)
    lean = field_ratio(read(balance, slow_hz) / 2)
    lead = read(left_lead, slow_hz)
    left = lean * np.exp(1j * lead) * (same * a + np.sqrt(1 - same ** 2) * b)
    return signal.istft(np.array([left, a / lean]), SR, nperseg=256, noverlap=192)[1][:, :N]


def scene():
    speed = curve(SPEED, np.arange(N) / SR)[0]
    struck = wok(speed) + clank() + spots() + smack() + bottle() + puffs()
    return ports(struck, diffuse=.45) + ports(sizzle(), diffuse=1)


def roll_off(x):
    return signal.sosfilt(signal.butter(12, 17140, fs=SR, output="sos"), x)


def record(dry):
    dry = 1.1 * np.tanh(dry / 1.1)

    def fir(hz, **kind):
        return signal.firwin(801, hz, window=("kaiser", 9), fs=SR, **kind)[None]

    gap = signal.oaconvolve(dry, fir((9750, 12300), pass_zero=False), "same")
    top = signal.oaconvolve(dry, fir(15850, pass_zero=False), "same")
    slowed = np.clip((5.045 - np.arange(N) / SR) / 0.019, 0, 1)
    attack = uniform_filter1d((top ** 2).mean(0), 200) > field_ratio(-35) ** 2
    opened = .28 * uniform_filter1d(attack * (1 - slowed), 100)
    mix = dry - slowed * gap - (1 - opened) * top
    return roll_off(signal.oaconvolve(mix, fir(16800), "same"))


dry = scene()
out = record(dry)
log_audio(out)
```